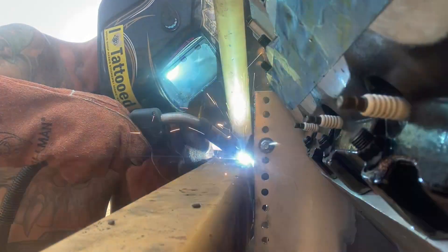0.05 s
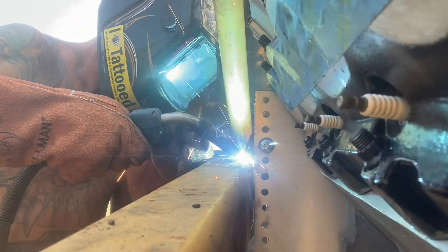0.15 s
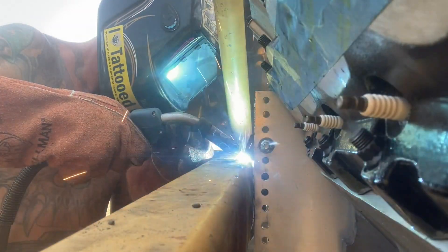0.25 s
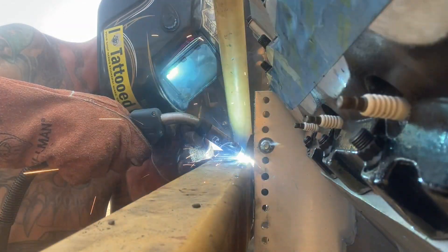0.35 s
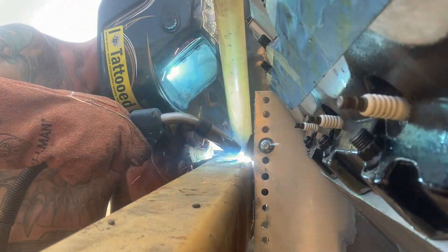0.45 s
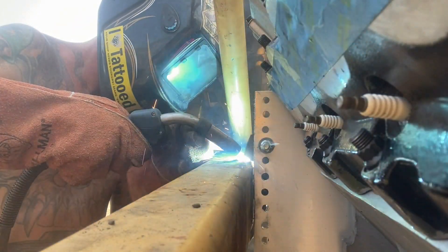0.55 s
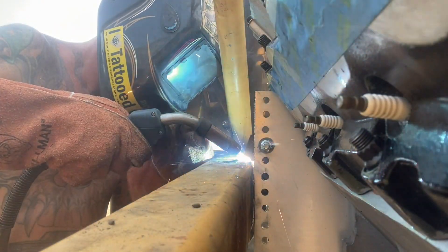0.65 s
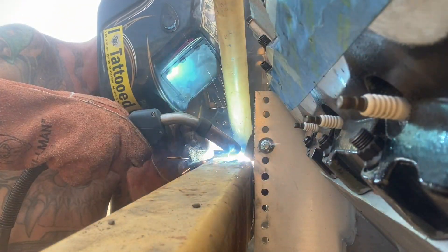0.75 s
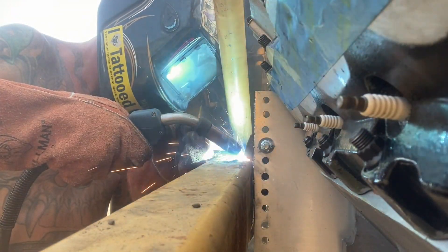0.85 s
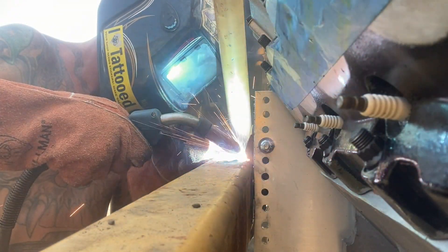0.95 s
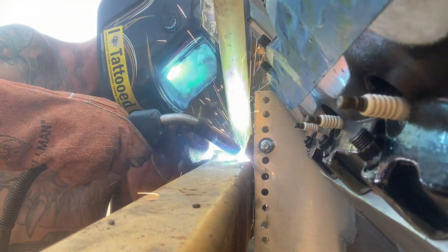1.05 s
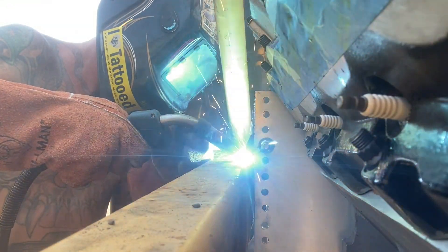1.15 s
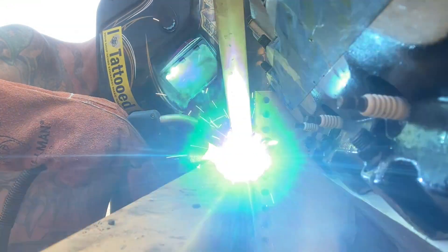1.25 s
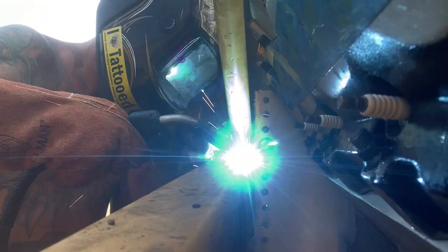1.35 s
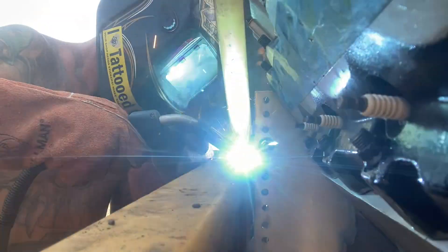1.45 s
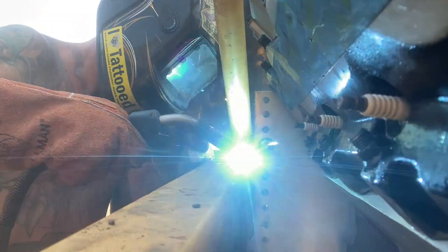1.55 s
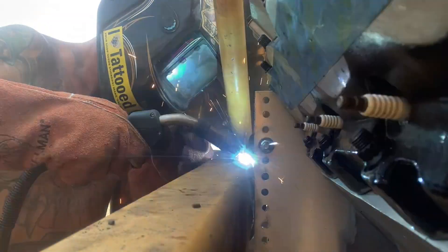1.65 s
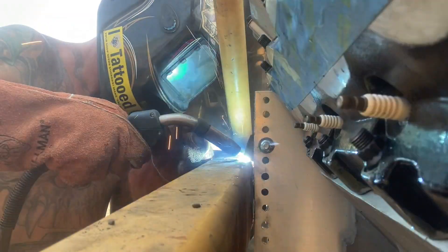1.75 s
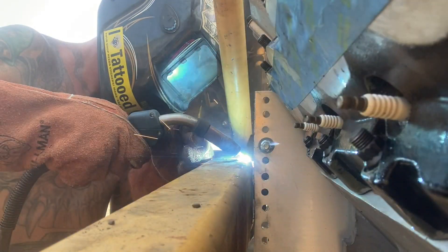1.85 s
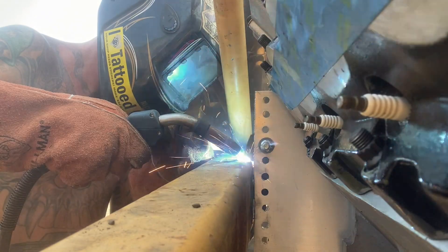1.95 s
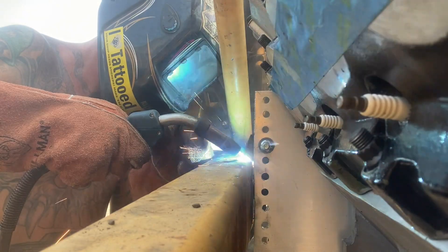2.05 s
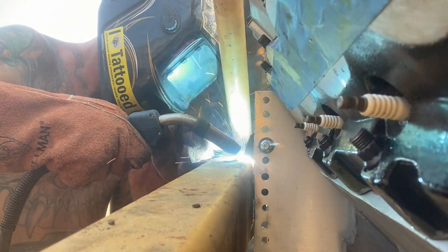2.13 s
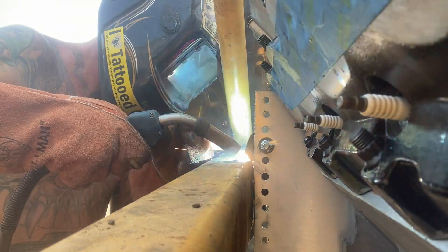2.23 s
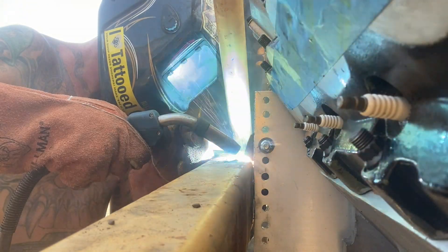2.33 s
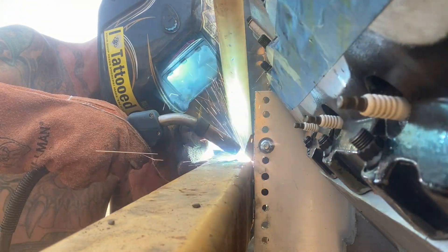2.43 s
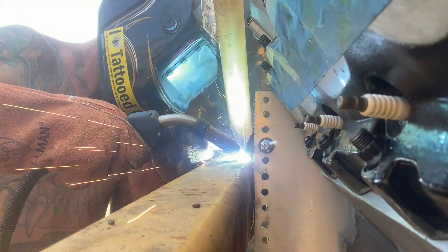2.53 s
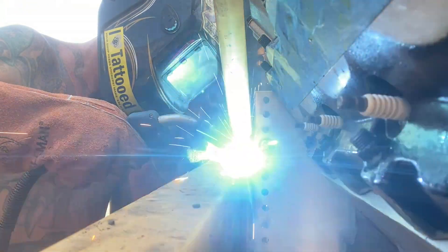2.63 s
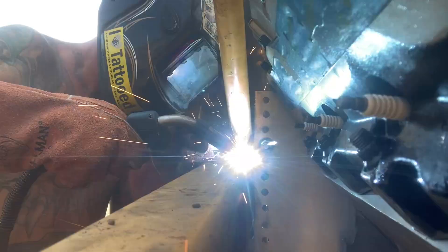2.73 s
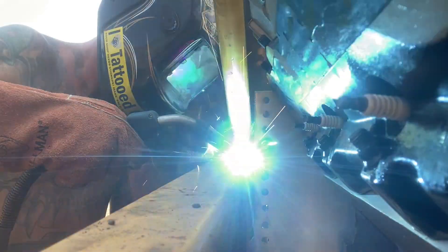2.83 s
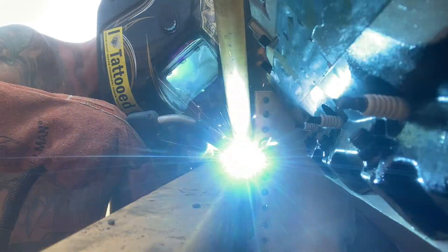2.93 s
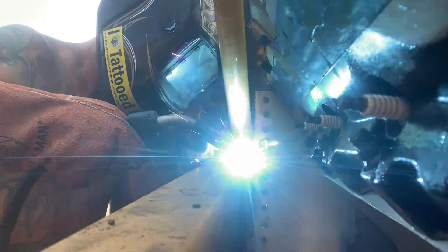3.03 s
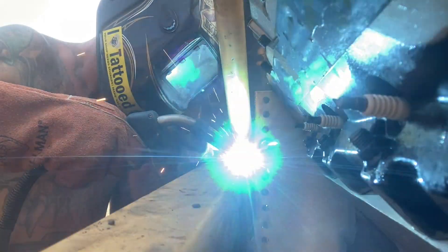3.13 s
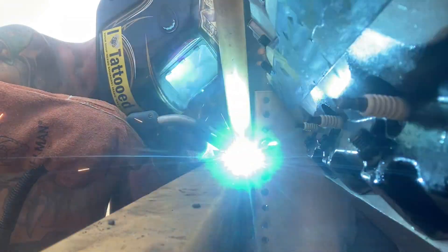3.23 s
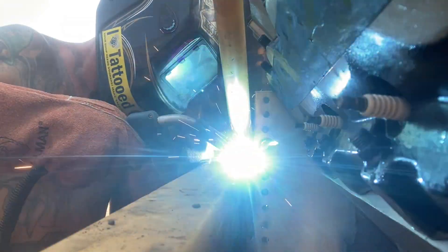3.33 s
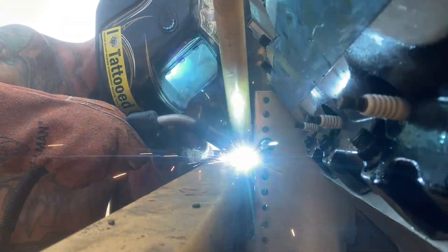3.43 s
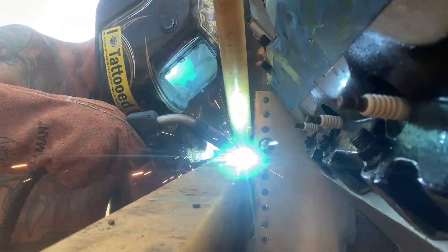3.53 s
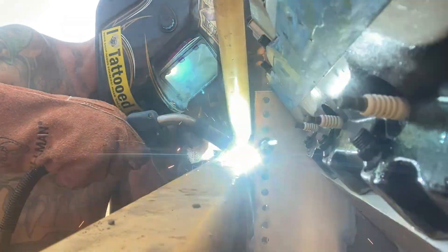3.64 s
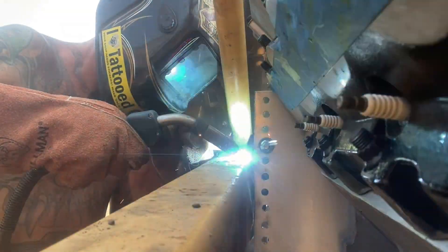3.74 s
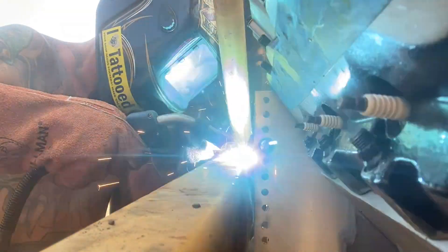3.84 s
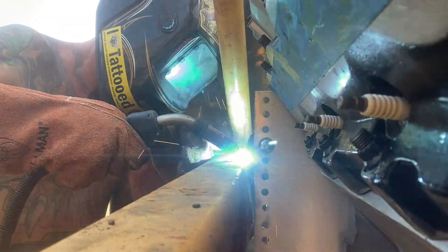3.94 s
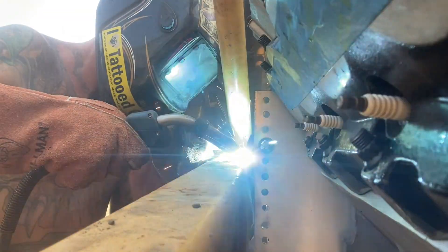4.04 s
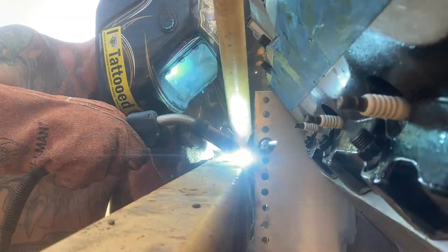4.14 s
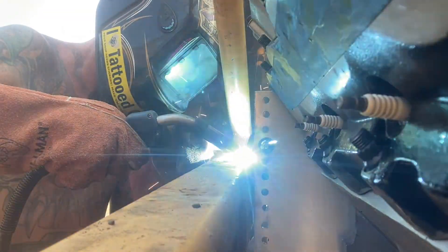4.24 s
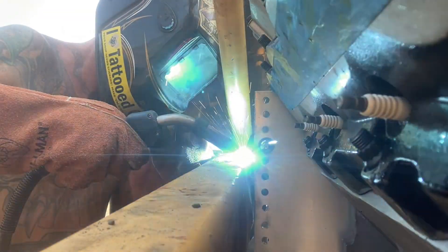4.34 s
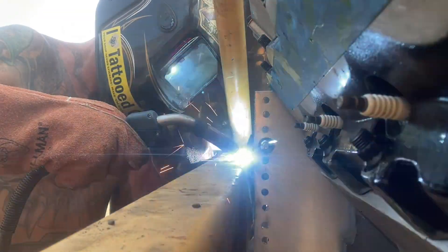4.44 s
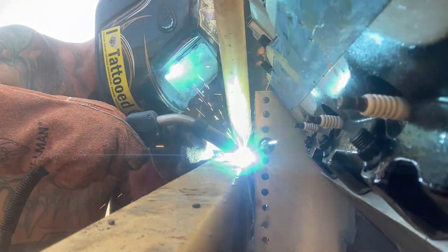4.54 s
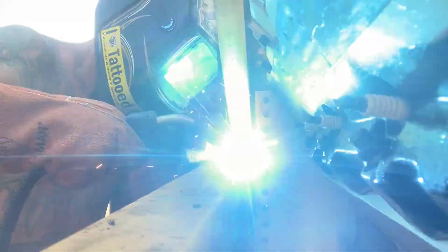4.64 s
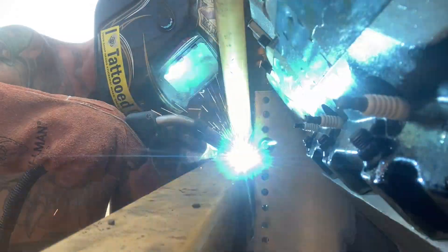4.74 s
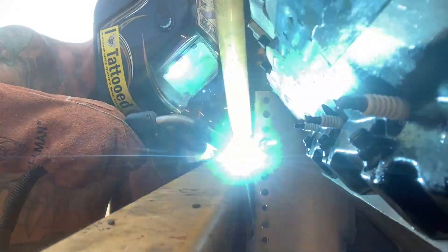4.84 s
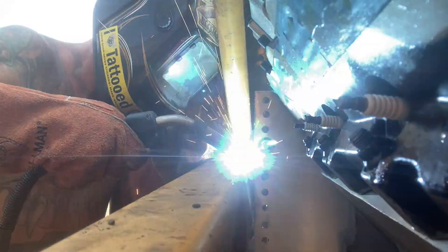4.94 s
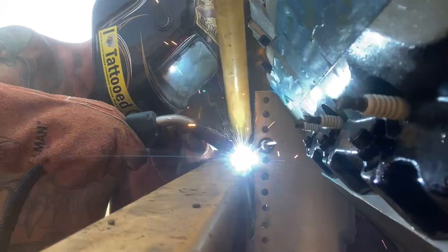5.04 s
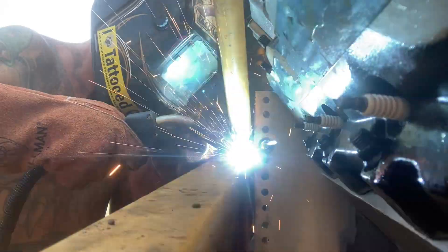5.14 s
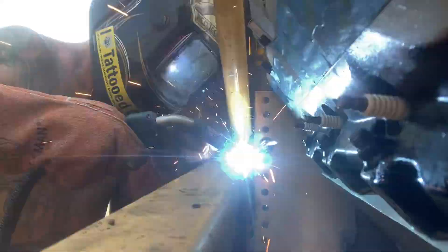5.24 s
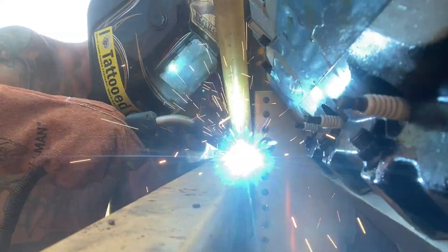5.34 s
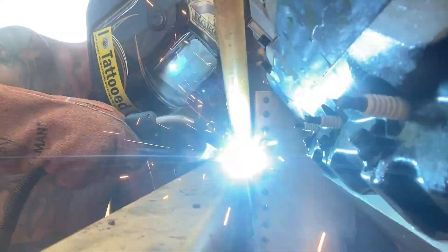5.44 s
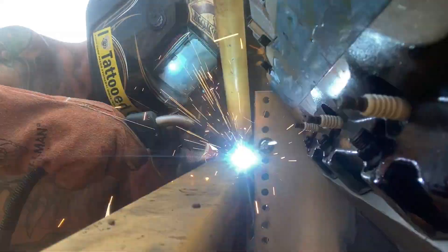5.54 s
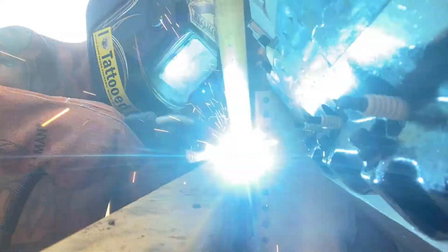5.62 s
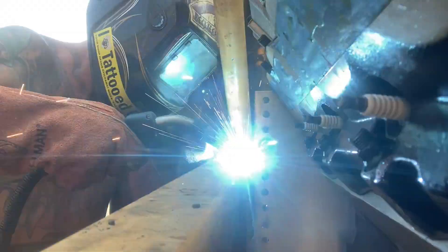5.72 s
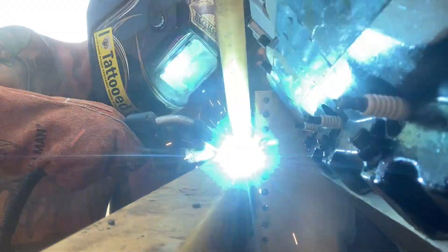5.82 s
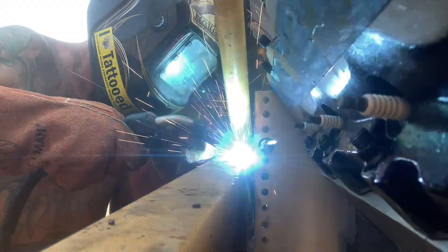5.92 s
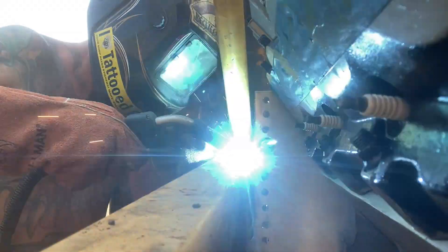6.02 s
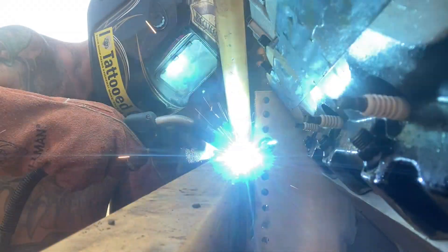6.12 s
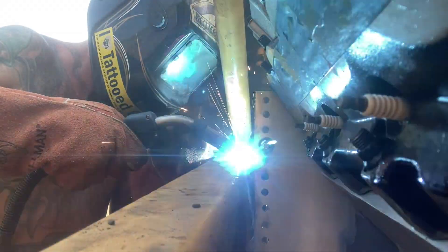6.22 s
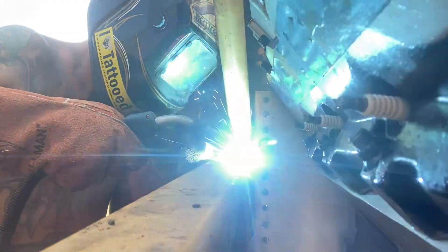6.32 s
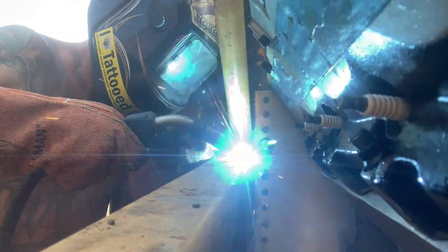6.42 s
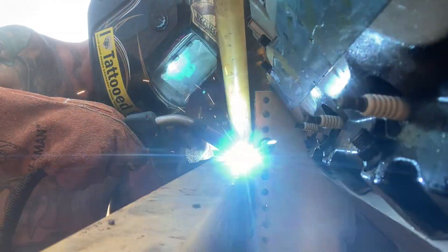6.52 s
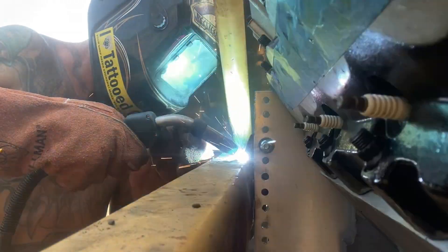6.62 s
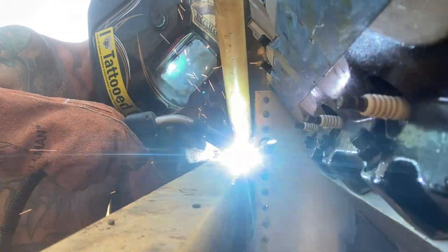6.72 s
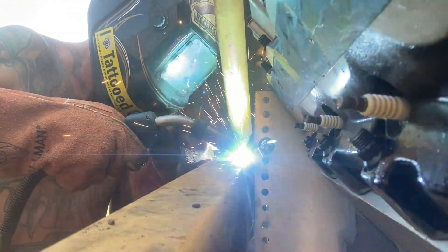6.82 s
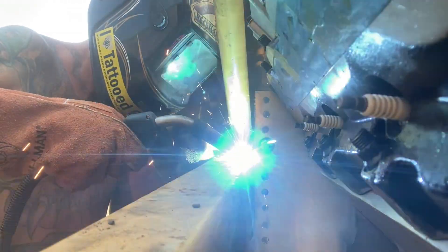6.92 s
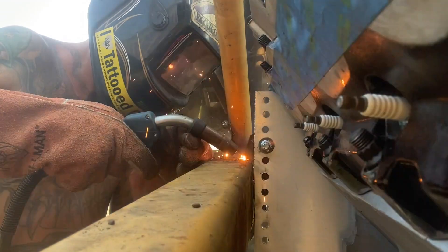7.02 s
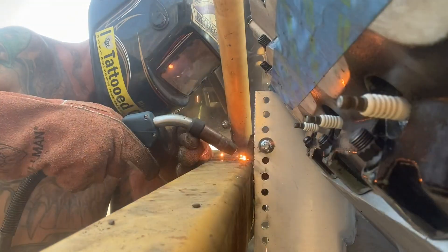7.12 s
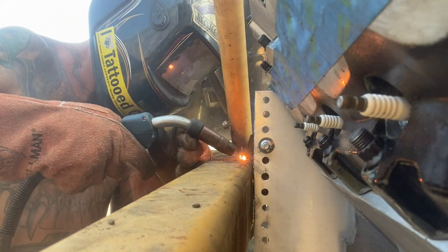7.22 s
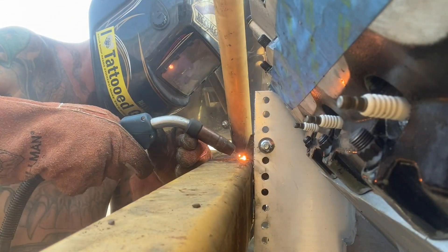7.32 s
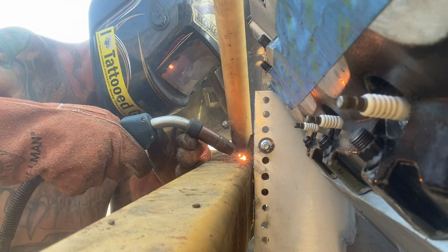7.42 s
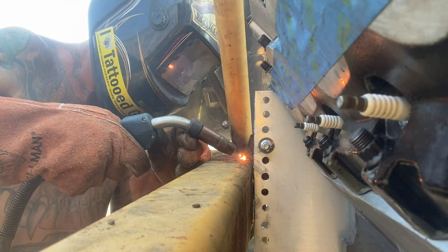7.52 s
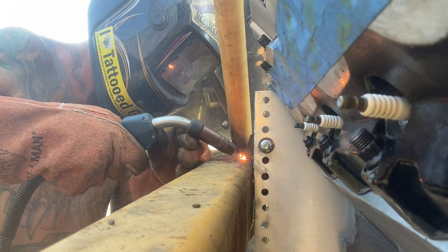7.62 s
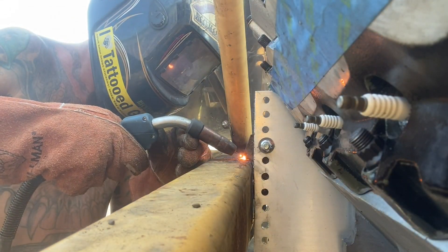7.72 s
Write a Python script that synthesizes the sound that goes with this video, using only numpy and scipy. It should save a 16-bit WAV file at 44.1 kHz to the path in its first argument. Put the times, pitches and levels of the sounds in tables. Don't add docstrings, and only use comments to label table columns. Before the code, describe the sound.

Close, bright buzzing crackle of wire welding on steel for seven seconds, with pops and short gaps, then near-quiet with ticking metal.

```python
import sys
import numpy as np
from scipy import signal
from scipy.fft import rfft, irfft
from scipy.io import wavfile
from scipy.ndimage import uniform_filter1d

SR = 44100
rng = np.random.default_rng(int(sys.argv[2]) if len(sys.argv) > 2 else 0)


def decibels_to_gain(level_db):
    exponent = np.asarray(level_db, float) / 20
    return 10 ** exponent


def to_wav(sig):
    pcm = np.clip(np.atleast_2d(sig), -1, 1) * 32767
    pcm = np.round(pcm).astype(np.int16)
    wavfile.write(sys.argv[1], SR, pcm.T)


N = 342656

# (frequency [Hz], rms level [dB])
MOTOR_LINES = [(53.8, -71.5), (86.1, -68.5), (102.3, -61.5), (312.2, -85), (608.3, -76.5)]
# (frequency [Hz], density [dB per Hz])
SHOP_AIR = [(79, -25.5), (135, -0.5), (193, -13), (382, 3), (616, -3.5), (799, -9.5), (1320, -17),
            (2130, -31.5), (5780, -37.5), (7790, -22), (16000, -47.5)]
# (time [s], motor level [dB])
BACKGROUND_LIFT = [
    (0.0, -82),
    (0.3, -80),
    (3.87, -81),
    (7.77, -70),
]
# (time [s], rate [strikes per s])
STRIKE_RATE = [(0.0, 68.0), (0.53, 56.0), (1.07, 46.0), (1.6, 56.0), (2.14, 60.0), (2.67, 56.0),
               (3.21, 80.0), (3.74, 62.0), (4.28, 74.0), (4.81, 58.0), (5.35, 58.0), (5.88, 72.0),
               (6.42, 58.0), (6.95, 46.0)]
# (time [s], peak level [dB])
STRIKE_VIGOUR = [(0.0, -11), (0.41, -14), (0.82, -14), (1.23, -11), (1.64, -15.5), (2.04, -19),
                 (2.45, -10.5), (2.86, -10.5), (3.27, -11.5), (3.68, -13), (4.09, -14), (4.5, -11),
                 (4.91, -15.5), (5.31, -10.5), (5.72, -15), (6.13, -12), (6.54, -13), (6.95, -13.5)]
# (last strike [s], restrike [s], last peak [dB], restrike peak [dB], hiss dip [dB])
STALLS = [(0.5271, 0.5628, -11.7, -14.8, -8.0), (1.0658, 1.0999, -16.5, -13.2, -8.0),
          (1.2577, 1.3064, -7.2, -7.6, -12.0), (1.3064, 1.3597, -7.6, -10.7, -10.0),
          (1.5784, 1.643, -5.3, -8.5, 0.0), (1.8565, 1.9134, -14.0, -6.0, 0.0),
          (2.1703, 2.2133, -14.8, -10.7, -18.0), (2.2133, 2.3385, -10.7, -3.8, -17.0),
          (2.7143, 2.7873, -6.9, -3.4, -5.0), (2.7873, 2.8226, -3.4, -9.2, -6.0),
          (2.8226, 2.8627, -9.2, -4.9, -14.0), (3.6454, 3.7044, -13.5, -6.7, -15.0),
          (3.7232, 3.7679, -18.3, -7.2, -10.0), (3.8545, 3.9226, -14.7, -7.4, -4.0),
          (4.0431, 4.0803, -9.7, -16.0, -7.0), (4.4089, 4.4922, -5.1, -10.8, -3.0),
          (4.5836, 4.6436, -12.7, -9.8, 0.0), (4.8039, 4.8569, -4.3, -14.1, -7.0),
          (4.8569, 4.9012, -14.1, -12.3, -12.0), (4.955, 5.0119, -3.3, -13.0, -3.0),
          (5.0119, 5.0608, -13.0, -17.5, -9.0), (5.0608, 5.1034, -17.5, -18.9, -8.0),
          (5.1034, 5.1405, -18.9, -10.9, -8.0), (6.6536, 6.7069, -7.9, -14.1, -7.0)]
# (time [s], peak level [dB], since the strike before [ms], to the next strike [ms])
DROP_BURSTS = [(0.1069, -6, 22.4, 14.6), (0.6454, -9.5, 15.4, 20), (1.6728, -6.5, 14.1, 27.4),
               (1.9326, -6.5, 18.9, 32.4), (2.087, -10.5, 27.2, 8.3), (2.3949, -7.5, 14.1, 18.1),
               (2.9039, -7.5, 34.6, 31), (3.038, -7, 18, 13.3), (3.1664, -7, 24.5, 31.3),
               (3.277, -6.5, 10.7, 8.8), (3.3964, -5, 18.1, 19.3), (3.5661, -12, 18.6, 12),
               (3.6366, -7, 17.1, 8.7), (4.1508, -6.5, 14.9, 10.9), (4.2458, -7.5, 23.8, 29),
               (4.659, -5.5, 16, 14), (4.9179, -8, 17.5, 11.8), (5.2215, -7, 15.3, 18.6),
               (5.268, -7, 36, 19), (5.3448, -5, 21, 17.7), (5.4697, -7, 33.6, 24),
               (5.559, -9.5, 27.3, 26.7), (5.6223, -10.5, 23.5, 32.4), (5.6781, -9, 16.3, 17.3),
               (5.9567, -10, 22.1, 32.2), (6.0388, -13, 22.7, 10.7), (6.1536, -6.5, 16.8, 24.4),
               (6.3712, -9, 43, 11.7), (6.4157, -7.5, 14.9, 11.7), (6.7683, -8, 23.6, 18.6)]
# (time [s], level [dB])
PLASMA_HISS = [(0.0, -25), (0.43, -30), (1.05, -38), (1.23, -25), (1.42, -49.5), (1.56, -27), (1.91, -35),
               (2.02, -31), (2.3, -46), (2.55, -31.5), (3.05, -33.5), (3.28, -23), (3.64, -38), (4.15, -31),
               (4.97, -33.5), (5.38, -38.5), (5.72, -32.5), (6.9, -28.5)]
# (time [s], nozzle opening [dB], aim at the ports [dB])
TORCH_MOTION = [(0.0, -16, 3.5), (0.56, -26.5, 1.5), (1.57, -1.5, 6), (1.78, -11, 5), (2.43, -12, 4.5),
                (3.2, -17, 5), (4.78, -18.5, 4), (5.18, -16, 6.5), (5.84, -18.5, 5.5), (6.79, -3, 5.5),
                (6.95, -6.5, 2.5)]
# (frequency [Hz], width [Hz], level [dB])
PRESENCE_PEAKS = [(4800, 480, -6), (5750, 490, -18)]
EDGE_PEAKS = [(5470, 530, 0), (6800, 120, -4.5), (8070, 86, -5.67)]
BRIGHT_PEAKS = [(9140, 320, 2), (10045, 350, -.5), (11150, 510, -3.5)]
TOP_PEAKS = [(12180, 400, -2.5), (13480, 500, 2), (14200, 520, -5.5), (15200, 500, -8.5)]
# (frequency [Hz], width [Hz], level [dB])
LEFT_BODY_PEAKS = [(158, 140, -24.5), (766, 22.3, -11), (1220, 22, -19), (1765, 130, -16.5),
                   (3000, 200, -21.5), (3320, 370, -20.5)]
RIGHT_BODY_PEAKS = [(179, 18, -21.5), (284, 150, -11.5), (403, 71, -16.5), (699, 93, -11),
                    (1272, 280, -12.5), (1906, 43, -10.5), (3650, 570, -9.5), (3910, 220, -24),
                    (4466, 450, -2)]
# (delay [s], level [dB])
LEFT_BOUNCES = [(.0012, -45.5), (.0031, -5.5), (.0057, -7)]
RIGHT_BOUNCES = [(.00175, 4.5), (.0034, 1.5), (.0057, -4.5), (.0082, -12.5), (0.0113, -7.5)]
# (time [s], peak level [dB])
AIR_BLASTS = [(0.369, -54), (1.296, -32.5), (1.513, -41), (1.567, -46), (1.661, -47), (1.919, -54),
              (2.33, -54), (2.554, -40), (2.774, -49.5), (2.945, -54.5), (3.695, -53), (5.459, -51),
              (6.419, -53)]
# (time [s], peak level [dB])
COOLING_TICKS = [
    (7.303, -57),
    (7.312, -47.5),
    (7.48, -69),
    (7.578, -78),
    (7.765, -64),
]
# (frequency [Hz], level [dB], decay t60 [s])
SEAM_MODES = [(314, 5, 0.17), (470, -14, .07), (736, 2, 0.096), (1052, 5, 0.11), (1810, -6, 0.074),
              (2076, -17, 0.1)]

ARC_OUT_S = 6.955
PORT_LAG_S = .000193
CYCLE_JITTER, STRIKE_SPREAD_DB = .23, 3.3
BODY_DB, BODY_FOLLOWS = -11, 0.13
STALL_EDGE_S, STALL_DEPTH = .006, 1.2


def rms_one(x):
    return x / np.sqrt(np.mean(x ** 2) + 1e-20)


def in_time(rows, axis=1):
    rows = np.array(rows)
    return np.interp(np.arange(N) / SR, rows[:, 0], rows[:, axis])


def clicks(events, spread_db=0.):
    s, peak_db = np.transpose(events)
    out = np.zeros(N)
    index = np.clip((s * SR).astype(int), 0, N - 1)
    out[index] = decibels_to_gain(peak_db + spread_db * rng.standard_normal(len(s)))
    return out


def fade(x, t60):
    return signal.lfilter([1], [1, -decibels_to_gain(-60 / (t60 * SR))], x + 1e-18)


def drift(rate_hz):
    r = np.exp(-2 * np.pi * rate_hz / SR)
    wander = signal.lfilter([1], [1, -2 * r, r * r], rng.standard_normal(N + 9000))
    return rms_one(wander[9000:])


def passed(x, hz, kind, order=2):
    sos = signal.butter(order, np.minimum(hz, .49 * SR), kind, fs=SR, output="sos")
    return signal.sosfilt(sos, x)


def resonate(x, peaks, low_hz=20.):
    hz = np.fft.rfftfreq(8192, 1 / SR) + 1
    power = sum(decibels_to_gain(2 * level_db) / (1 + ((hz - centre ** 2 / hz) / width) ** 2)
                for centre, width, level_db in peaks)
    power = power / (1 + (low_hz / hz) ** 12)
    cepstrum = irfft(np.log(power) / 2)
    cepstrum[1:4096] *= 2
    response = irfft(np.exp(rfft(cepstrum[:4097], 8192)))
    response = response.reshape((1,) * (x.ndim - 1) + (-1,))
    return signal.oaconvolve(x, response, axes=-1)[..., :N]


def coloured(spectrum):
    hz = np.maximum(np.fft.rfftfreq(N, 1 / SR), 1)
    points_hz, points_db = np.transpose(spectrum)
    shape = decibels_to_gain(np.interp(np.log(hz), np.log(points_hz), points_db))
    return rms_one(irfft(rfft(rng.standard_normal((2, N))) * shape, N))


def workshop():
    t = np.arange(N) / SR
    lines = np.zeros(N)
    for hz, level_db in MOTOR_LINES:
        level = decibels_to_gain(level_db + 5 + 0.88 * drift(2.8))
        lines += level * np.sin(2 * np.pi * hz * t + (hz / 215) ** 2 * drift(4.6))
    rumble = decibels_to_gain(-66.5) * rms_one(passed(rng.standard_normal((2, N)), [30, 125], "band"))
    air = decibels_to_gain([[-74], [-66]]) * coloured(SHOP_AIR)
    lift = decibels_to_gain(in_time(BACKGROUND_LIFT) - BACKGROUND_LIFT[-1][1])
    return lift * (lines + rumble) * decibels_to_gain([[-3.5], [2.5]]) + air


def strike_list():
    rate, vigour_db = in_time(STRIKE_RATE), in_time(STRIKE_VIGOUR)
    chance = rng.standard_normal((N // 400, 2))

    def plain_db(s):
        i = int(s * SR)
        return vigour_db[i] + STRIKE_SPREAD_DB * chance[i // 400, 1]

    burst_waits = [(s - before / 1000, s + after / 1000) for s, _, before, after in DROP_BURSTS]
    waits = [row[:2] for row in STALLS] + burst_waits
    marks = [row[:2] for row in DROP_BURSTS]
    marks += [(last, last_db) for last, _, last_db, _, _ in STALLS]
    marks += [(restrike, restrike_db) for _, restrike, _, restrike_db, _ in STALLS]
    marks += [(s, plain_db(s)) for s in np.r_[np.ravel(burst_waits), .004, ARC_OUT_S - .01]]
    strikes = []
    for s, peak_db in marks:
        if all(abs(s - other) > .008 for other, _ in strikes):
            strikes.append((s, peak_db))
    times = sorted(s for s, _ in strikes)
    for start, end in zip(times, times[1:]):
        middle = (start + end) / 2
        if any(a < middle < b for a, b in waits):
            continue
        count = max(1, round((end - start) * rate[int(middle * SR)]))
        for s in np.linspace(start, end, count + 1)[1:-1]:
            jitter = CYCLE_JITTER * chance[int(s * SR) // 400, 0] * (end - start) / count
            strikes.append((s + jitter, plain_db(s)))
    return strikes


def sizzle_db():
    t = np.arange(N) / SR
    sink = sum(STALL_DEPTH * dip_db * ((t > a) & (t < b)) for a, b, _, _, dip_db in STALLS)
    return in_time(PLASMA_HISS) + uniform_filter1d(sink, max(1, round(STALL_EDGE_S * SR)))


def corner(x, bounces):
    for lag_s, keep in bounces:
        taps = np.zeros(round(lag_s * SR) + 1)
        taps[0], taps[-1] = 1, -np.clip(keep, 0, .9)
        x = signal.lfilter(taps[::-1], taps, x)
    return x


def arc_pressure(cracks, spread_db, snap_db, tail_db, early_db, hiss_db, scatter_db):
    strikes = clicks(cracks, spread_db)
    burning = np.arange(N) / SR < ARC_OUT_S
    spatter = rng.random(N) < 60 / SR
    spit_db = .5 * (sizzle_db() + in_time(PLASMA_HISS)) + 6 + 3.5 * rng.standard_normal(N)
    strikes = strikes + spatter * decibels_to_gain(spit_db) * burning
    settling = decibels_to_gain(-10.5) * fade(strikes, .004) + decibels_to_gain(tail_db) * fade(strikes, .03)
    backward = strikes[::-1]
    necking = decibels_to_gain(early_db) * fade(backward, 0.038)[::-1] + decibels_to_gain(-4) * fade(backward, 0.0014)[::-1]
    hiss = decibels_to_gain(sizzle_db() + hiss_db + 3.5 * drift(150) + 3.0 * drift(30)) * burning
    level = np.hypot(settling + necking, hiss)
    fizz = level * rng.standard_normal((3, N)) * decibels_to_gain([[0], [scatter_db], [scatter_db]])
    fizz[0] += corner(decibels_to_gain(snap_db) * strikes, [(.00061, .56), (.00023, .85)])
    return fizz


def treble(pressure):
    opening = decibels_to_gain(in_time(TORCH_MOTION) + 3.8 * drift(28))
    aim = decibels_to_gain(in_time(TORCH_MOTION, axis=2) - 5.5)
    edge = opening * resonate(pressure, EDGE_PEAKS, low_hz=4900)
    top = aim * resonate(pressure, TOP_PEAKS, low_hz=10700)
    presence = passed(resonate(pressure, PRESENCE_PEAKS, low_hz=4010), 4320, "low", order=6)
    return resonate(pressure, BRIGHT_PEAKS, low_hz=8980) + presence + edge + top


def echoes(x, table, dull_hz):
    bounced = sum(decibels_to_gain(level_db) * np.roll(x, round(s * SR)) for s, level_db in table)
    return x + passed(bounced, dull_hz, "low")


def room(x, t60, dull_hz):
    t = np.arange(int(t60 * SR)) / SR
    noise = rng.standard_normal((2, len(t)))
    tail = rms_one(passed(noise, dull_hz, "low", order=1) * decibels_to_gain(-60 * t / t60) * (t > .002))
    return signal.fftconvolve(x[None], tail / np.sqrt(len(t)), axes=1)[:, :N]


def arc():
    cracks = strike_list()
    bright = arc_pressure(cracks, spread_db=.3, snap_db=17.5, tail_db=-14.5, early_db=-23,
                          hiss_db=-3, scatter_db=-4)
    near, *scattered = treble(bright)
    deep, own_left, own_right = arc_pressure(cracks, spread_db=3., snap_db=21, tail_db=-14.5,
                                             early_db=-16, hiss_db=-3, scatter_db=-5)
    left = resonate(echoes(deep + own_left, LEFT_BOUNCES, 3500), LEFT_BODY_PEAKS, low_hz=66)
    right = resonate(echoes(deep + own_right, RIGHT_BOUNCES, 1620), RIGHT_BODY_PEAKS, low_hz=70)
    body_level = decibels_to_gain([[7], [2.2]] + (BODY_DB + BODY_FOLLOWS * in_time(TORCH_MOTION)))
    bodies = passed(np.array([left, right]), 4820, "low", order=4) * body_level
    lag = np.exp(-2j * np.pi * np.fft.rfftfreq(N, 1 / SR) * PORT_LAG_S)
    far = -irfft(rfft(near) * lag, N)
    direct = np.array([near, far]) + scattered + bodies
    return direct + decibels_to_gain(-28) * room(bodies[1] + decibels_to_gain(-9) * near, .5, 2000)


def supply_hum():
    t = np.arange(N) / SR
    current = decibels_to_gain(.5 * (in_time(STRIKE_VIGOUR) + 12.5) + 3.0 * drift(26)) * (t < ARC_OUT_S)
    return current * np.sin(2 * np.pi * 300 * t + 0.89 * drift(2.6)) * decibels_to_gain([[-74], [-60]])


def puffs():
    t = np.arange(int(.09 * SR)) / SR
    swing = np.sin(2 * np.pi * 1.694 * np.log(1 + t / 0.0045)) * decibels_to_gain(-60 * t / 0.11)
    late = np.roll(clicks(AIR_BLASTS), round(0.014 * SR))
    return signal.fftconvolve(late, -decibels_to_gain(1.0) * swing)[:N] * decibels_to_gain([[.4], [-.4]])


def seam():
    hits = clicks(COOLING_TICKS)
    modes = [(hz, 1.6 / t60, level_db + 39.5) for hz, level_db, t60 in SEAM_MODES]
    ring = resonate(hits, modes)
    rattle = decibels_to_gain(-8) * fade(hits, 0.2) * passed(rng.standard_normal((2, N)), 2370, "low", order=1)
    return ring * decibels_to_gain([[-3], [3]]) + rattle


def scene():
    return decibels_to_gain(6) * arc() + puffs() + supply_hum() + workshop() + seam()


def band_limit(x):
    return signal.sosfilt(signal.butter(12, 16640, fs=SR, output="sos"), x)


def record(dry):
    rounded = 1.2 * np.tanh(dry / 1.2)
    rolled = passed(passed(rounded, 46, "high"), 14600, "low", order=5)
    top_cut = signal.cheby2(16, 45, 16800, fs=SR, output="sos")
    mix = signal.sosfilt(top_cut, rolled)
    return band_limit(mix)


dry = scene()
out = record(dry)
to_wav(out)
```